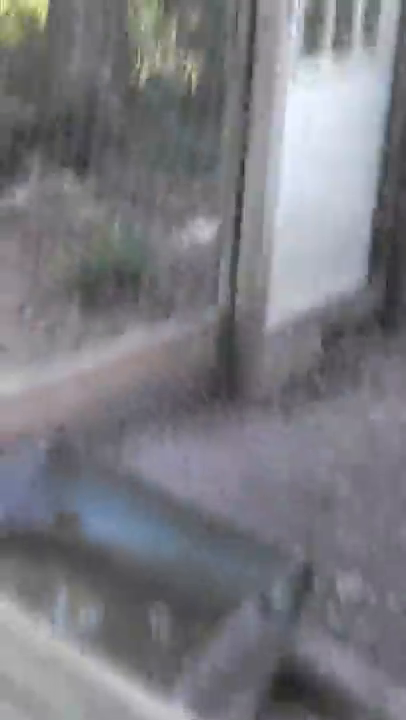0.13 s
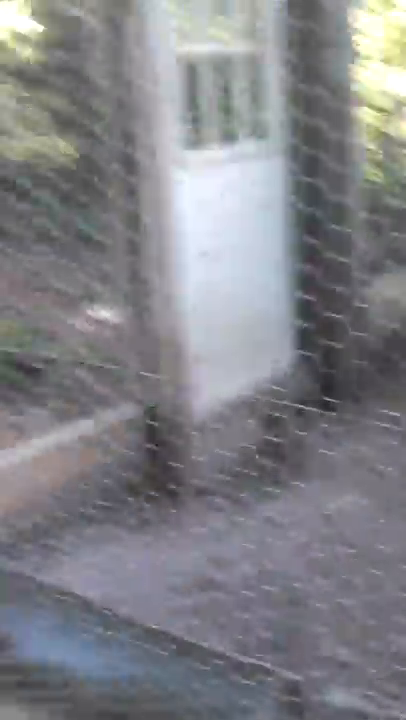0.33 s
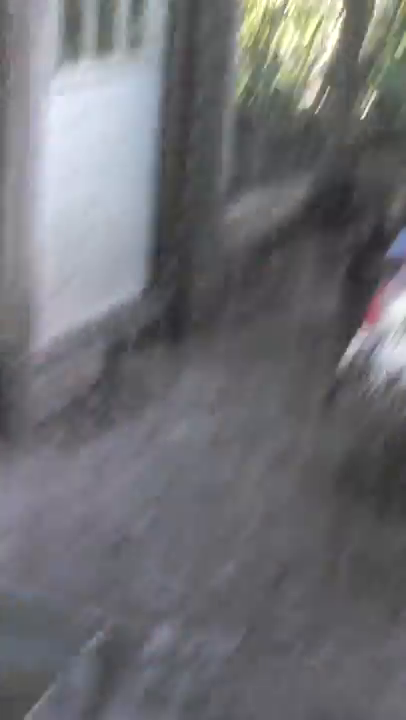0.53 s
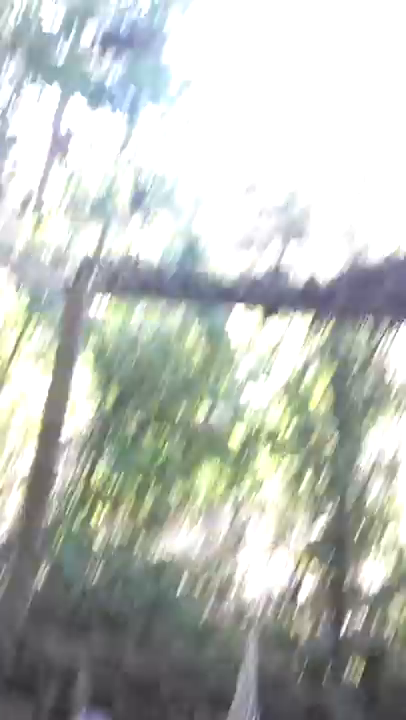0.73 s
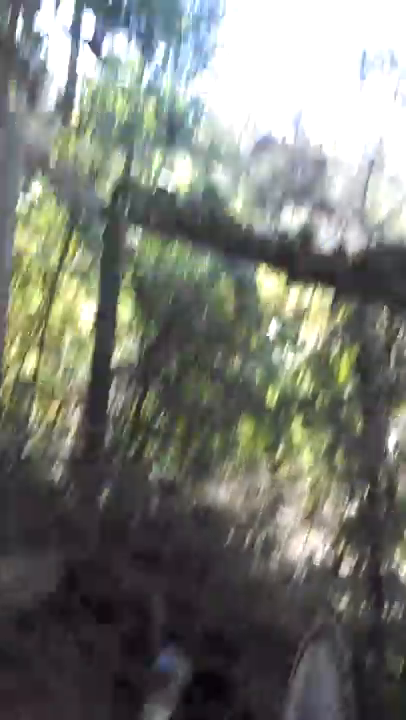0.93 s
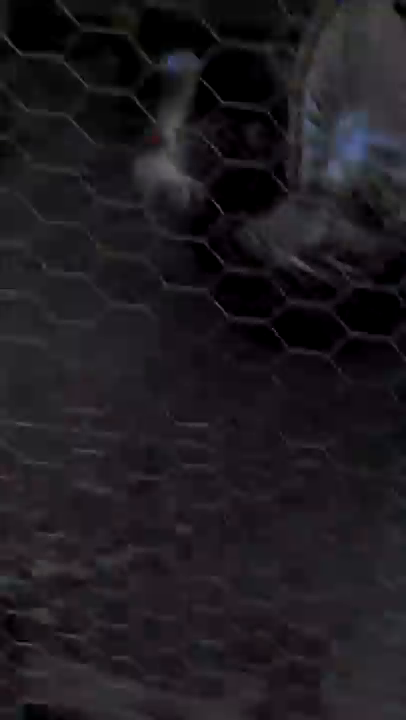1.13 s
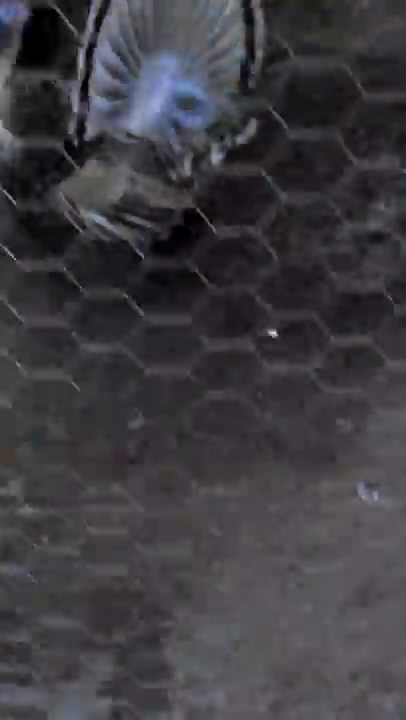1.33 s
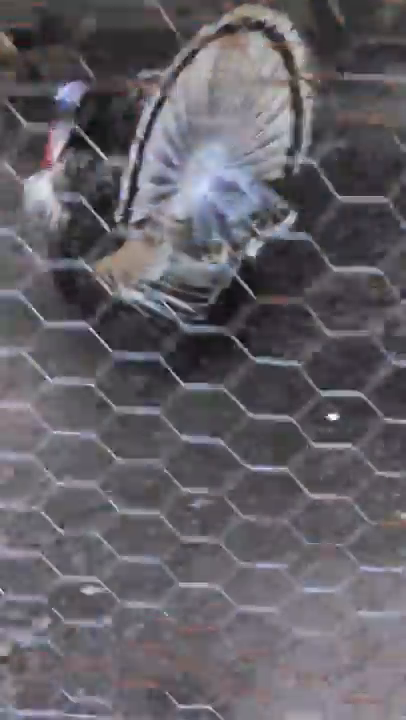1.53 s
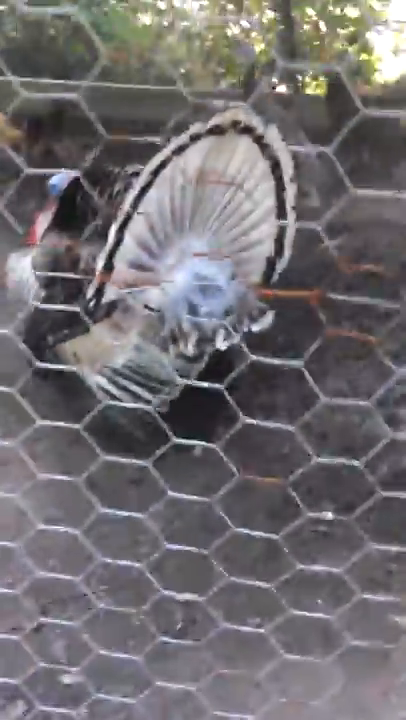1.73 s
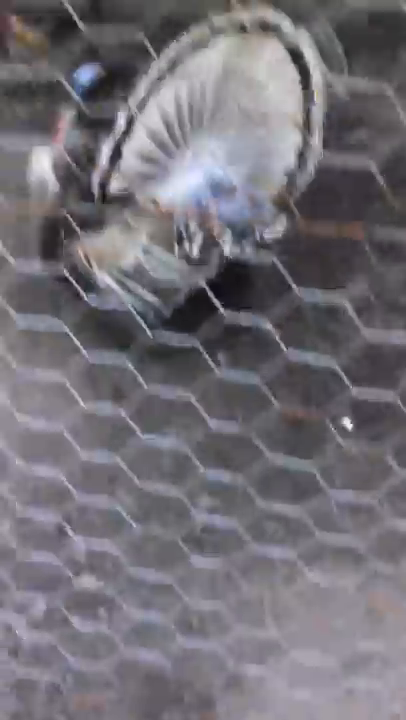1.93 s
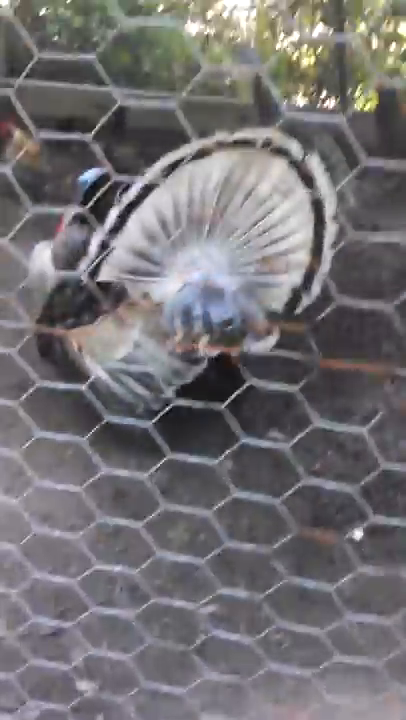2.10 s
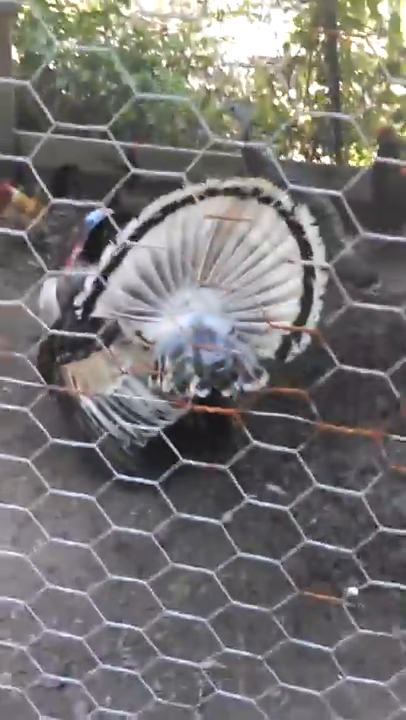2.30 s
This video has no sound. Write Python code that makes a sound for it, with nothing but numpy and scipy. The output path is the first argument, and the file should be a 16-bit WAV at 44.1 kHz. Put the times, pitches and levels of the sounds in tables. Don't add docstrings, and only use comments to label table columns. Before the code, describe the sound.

Turkey's single short spit with a deep drum beneath, then dragging feathers and knocks, outdoors

```python
import sys
import numpy as np
from scipy import signal
from scipy.io import wavfile
from scipy.ndimage import uniform_filter1d

SR = 44100
rng = np.random.default_rng(int(sys.argv[2]) if len(sys.argv) > 2 else 0)


def store_pcm(level_fs):
    pcm = np.round(np.clip(level_fs, -1, 1) * 32767).astype(np.int16)
    wavfile.write(sys.argv[1], SR, np.atleast_2d(pcm).T)


def boost_factor(decibels):
    exponent = np.asarray(decibels, float) / 20
    return 10 ** exponent


N = 108397
TIME = np.arange(N) / SR
PORT_LEAD_S = 0.00013


def read(points, hz):
    f, value = np.transpose(points)
    return np.interp(np.log(hz + 1), np.log(f + 1), value)


def curve(points, col=1):
    rows = np.transpose(points)
    return np.interp(TIME, rows[0], rows[col])


def evened(x):
    return x / np.sqrt(np.mean(x ** 2) + 1e-20)


def sides(pan_db):
    return boost_factor(np.array([[pan_db / 2], [-pan_db / 2]]))


def hump(middle, length):
    return np.exp(-.5 * ((TIME - middle) / (length / 3)) ** 2)


def resonate(x, hz, width):
    turn = np.exp(2j * np.pi * hz * np.arange(x.shape[-1]) / SR)
    r = np.exp(-np.pi * width / SR)
    return 2 * (turn * signal.lfilter([1 - r], [1, -r], x / turn + 1e-18)).real


# (frequency [Hz], likeness [0-1])
PORT_LIKENESS = [(70, 0.19), (300, 1), (550, 0.65), (1000, 0.63), (1600, 0.43), (2800, 0.34), (5000, 0)]


def noise(tone, patchy_db, tilt_db=0):
    frames, hz = N // 128 + 5, np.fft.rfftfreq(512, 1 / SR)
    a, b, c, d, patches = rng.standard_normal((frames, 257, 5)).T
    patches = uniform_filter1d(patches, size=8, axis=0)
    patches = evened(uniform_filter1d(patches, size=14, axis=1))
    same = np.clip(read(PORT_LIKENESS, hz), -1, 1)[:, None]
    lag = np.exp(2j * np.pi * hz * PORT_LEAD_S * (1 + hz / 2000))[:, None]
    left = a + 1j * b
    right = same * left * lag + np.sqrt(1 - same ** 2) * (c + 1j * d)
    tilt = np.interp(np.arange(frames) * 128, np.arange(N), tilt_db * np.ones(N))
    tilt = tilt * (hz / (hz + 7000))[:, None]
    gain = boost_factor(read(tone, hz)[:, None] + patchy_db * patches + 5.1 * tilt)
    z = np.array([left, right]) * gain
    return evened(signal.istft(z, nperseg=512, noverlap=384)[1][:, :N])


# (frequency [Hz], level [dB])
WASH_TONE = [(25, -14), (70, 12), (150, -7.5), (350, 6.5), (900, -8), (3500, -15), (7500, -20),
             (10000, -40)]
# (time [s], treble level [dB])
LEAVES = [(0, 7.6), (.3, 4.34), (.5, 3.74), (1.3, 2.9), (1.6, 2.5), (1.95, 0.51), (2.46, 1.46)]
# (time [s], level [dB])
CART = [(1.2, -65), (1.4, -47), (2.46, -52)]
WASH_DB = -42


def wash():
    out = boost_factor(WASH_DB) * noise(WASH_TONE, 2.22, curve(LEAVES)) * sides(-3.1)
    cart = resonate(rng.standard_normal((2, N)), 205, 170)
    return out + boost_factor(curve(CART)) * evened(resonate(cart, 205, 170))


# (frequency [Hz], level [dB], width [Hz])
HUM = [(376.6, -52, 2.76), (559, -56.5, 8.5), (455, -65.5, 10)]
# (time [s], level [dB])
DRONE = [(0, -45), (.17, -39.5), (.35, -51), (.8, -56), (.9, -44), (1.1, -38), (1.4, -46), (1.55, -51),
         (2.1, -47), (2.46, -44.5)]
# (time [s], level [dB])
WHINE = [(0, -59), (.3, -54.5), (.6, -55.5), (1.1, -55), (1.4, -63.5), (1.75, -61), (2.05, -58),
         (2.46, -62)]
DRONE_HZ, WHINE_HZ = 515.2, 752.3


def motor():
    out = np.zeros((2, N))
    late = TIME - np.array([[PORT_LEAD_S], [0]])
    lines = [*HUM, (DRONE_HZ, curve(DRONE), 6), (WHINE_HZ, curve(WHINE), 8)]
    for hz, db, width in lines:
        wobble, sway = resonate(resonate(rng.standard_normal((2, N)), 0, width), 0, width)
        level = boost_factor(db + 1 + 3.28 * evened(sway))
        out += level * np.sin(2 * np.pi * hz * late + 0.79 * evened(wobble)) * sides(-5.5)
    return out


def grains():
    bursts = boost_factor(4.0 * np.minimum(rng.exponential(1, N), 3)) * (rng.random(N) < .01)
    return .8 + uniform_filter1d(bursts, size=40) * 3.0


# (middle [s], length [s], level [dB], brightness [0-1], pan [dB])
SCUFFS = [(.0, 0.036, -36.5, 0.86, 12), (0.078, 0.26, -37, 0.74, 5), (0.395, 0.048, -35, 0.31, 10),
          (0.555, 0.061, -40, 0.54, -9.5), (0.654, 0.072, -38, 0, 5.5), (0.726, 0.017, -38, 0.52, -11.5),
          (0.858, 0.095, -35, 0.65, -9.5), (1.362, 0.057, -39.5, 0.64, -7), (1.665, 0.046, -46.5, 0.2, 11),
          (2.013, 0.04, -40.5, 0.08, -16), (2.176, 0.037, -36, 0, 5), (2.367, 0.052, -39.5, 0.03, 7),
          (2.44, 0.11, -39.5, 0.1, 0)]
# (frequency [Hz], level [dB])
DULL = [(200, 4.5), (400, 11.5), (900, 0.5), (1600, 3.5), (2600, -1), (3900, -0.5), (5500, -46),
        (15000, -108)]
# (frequency [Hz], level [dB])
BRIGHT = [(200, -5.5), (2500, -12), (3600, 0.5), (5000, -0.5), (7000, 0.5), (8500, -3), (10500, -15.5),
          (15500, -12.5)]


def scuffs():
    grit = grains()
    dull, bright = noise(DULL, 3.0) * grit, noise(BRIGHT, 1.8) * grit
    out = np.zeros((2, N))
    for s, length, db, brightness, pan_db in SCUFFS:
        colour = (1 - brightness) * dull + brightness * bright
        out += boost_factor(db) * sides(pan_db) * hump(s, length) * colour
    return out


# (peak [s], length [s], level [dB], frequency [Hz], pan [dB])
THUMPS = [(0.011, 0.044, -38.5, 62.2, -6), (0.343, 0.056, -42.5, 70, -16.5), (0.449, 0.061, -41.5, 118, -1),
          (0.724, 0.046, -41.5, 65, -4.5), (1.036, 0.029, -30, 70.5, -9.5), (1.357, 0.09, -40, 68, -8.5),
          (1.42, .03, -40.5, 193, -2.5), (1.49, 0.015, -29.5, 111, 10.5), (1.545, 0.068, -20, 75, 0.3),
          (1.934, 0.045, -24.5, 74, -16.5), (1.951, 0.025, -23.5, 80.5, -12), (2.064, 0.068, -32.5, 55, 4),
          (2.241, 0.03, -34, 61, -2.5), (2.318, 0.065, -36, 68.4, -1), (2.435, 0.068, -38, 62, 0.5)]
LEAD_PER_DB = 0.6


def thumps():
    out, right = np.zeros((2, N)), np.array([[0], [1]])
    for s, length, db, hz, pan_db in THUMPS:
        phase = 2 * np.pi * hz * (TIME - s) - LEAD_PER_DB * pan_db * right
        out += boost_factor(db) * sides(pan_db) * hump(s, length) * np.cos(phase)
    return out


# (time [s], peak level [dB], frequency [Hz], width [Hz], pan [dB])
TICKS = [(.267, -38, 4000, 3000, -2), (.325, -46, 4600, 3000, -7), (.533, -33.5, 4000, 3000, -3),
         (0.559, -40, 12000, 6000, 0), (0.7212, -37.5, 8800, 7000, 2), (.803, -43, 10000, 7000, -3),
         (.937, -35, 9000, 9000, 0), (0.9441, -34, 6000, 6000, -9), (.986, -34, 5500, 4000, -3),
         (1.014, -38, 11000, 9000, 2), (1.021, -45, 12000, 7000, 7), (1.065, -43, 12000, 7000, -2),
         (1.0745, -27.5, 5700, 3460, -15), (1.0795, -33, 5500, 3500, -8), (1.098, -48, 4000, 3000, -3),
         (1.135, -41, 11000, 7000, -9), (1.17, -34, 6960, 4970, -6), (1.21, -36, 6050, 4000, 6),
         (1.218, -34, 9450, 9000, 8), (1.287, -31.5, 8700, 9000, -23), (1.313, -29, 6100, 3980, -4),
         (1.3475, -20, 4300, 3800, -5), (1.349, -32.5, 1100, 900, -3), (1.8625, -16, 2360, 4470, -10.5),
         (1.863, -23.5, 790, 800, -9), (1.865, -20.5, 1800, 2500, -3)]


def ticks():
    out, t = np.zeros((2, N)), np.arange(600) / SR
    for s, db, hz, width, pan_db in TICKS:
        dust = rng.standard_normal((2, 600)) * boost_factor(-60 * t / .012)
        crack = (t == 0) + .1 * dust
        for _ in range(3):
            crack = resonate(crack, hz, width)
        at = round(s * SR)
        out[:, at:at + 600] += boost_factor(db) * sides(pan_db) * crack / abs(crack).max()
    return out


# (time [s], frequency [Hz], level [dB])
WHISTLE = [
    (.585, 2600, -64),
    (.605, 2760, -50),
    (.625, 2840, -48),
    (.64, 2660, -58),
    (.68, 2700, -50),
    (.72, 2780, -42),
    (.765, 2660, -48),
    (.8, 2300, -58),
    (.85, 1980, -66),
]


def bird():
    waver_hz = 25 * evened(uniform_filter1d(rng.standard_normal(N), size=300))
    waver_db = 2.5 * evened(uniform_filter1d(rng.standard_normal(N), size=500))
    turns = np.cumsum(curve(WHISTLE) + waver_hz) / SR
    on = (TIME > WHISTLE[0][0]) & (TIME < WHISTLE[-1][0])
    level = on * boost_factor(curve(WHISTLE, col=2) - 1 + waver_db)
    return level * np.sin(2 * np.pi * turns - np.array([[0], [2.1]])) * sides(-5)


# (frequency [Hz], width [Hz], level [dB])
THROAT = [(653, 120, 1), (808, 116, 1), (1180, 140, -5.5), (1670, 220, 1.5), (2790, 440, 0),
          (6200, 600, -16)]
THROAT_PAN_DB = [7.5, -12.5, 15.5, -5, -13.5, 30.5]
RATTLE_S, RATTLE_HZ, RATTLE_DB = 1.5012, 201.3, -21
RATTLE_LATE_S_PER_HZ, RATTLE_ROUGH = 4.5e-6, 0.25


def rattle():
    kicks = np.zeros(N)
    for k in range(5):
        kicks[round((RATTLE_S + k / RATTLE_HZ) * SR)] = 1
    air = rng.standard_normal((2, N)) * RATTLE_ROUGH * 0.22 * (TIME > RATTLE_S)
    out, sign = np.zeros((2, N)), 1
    for (hz, width, db), pan_db in zip(THROAT, THROAT_PAN_DB):
        low = min(hz, 2000)
        swell = hump(RATTLE_S + 0.00087 + low * RATTLE_LATE_S_PER_HZ, 0.013 + low * 4e-6)
        ring = resonate((air - kicks) * swell, hz, width) * SR / (2 * np.pi * width)
        out += sign * boost_factor(db) * sides(pan_db) * ring
        sign = -sign
    return boost_factor(RATTLE_DB) * out


# (time [s], level [dB])
HISS = [
    (1.495, -77),
    (1.506, -36),
    (1.53, -28),
    (1.547, -24),
    (1.575, -30),
    (1.592, -32),
    (1.615, -39.5),
    (1.66, -47),
    (1.92, -53.5),
]
# (frequency [Hz], level [dB])
HISS_TONE = [(300, -7.5), (1000, -11.5), (2600, -10), (4200, -3.5), (7000, 4), (8700, -6.5), (10500, -18),
             (15500, -10.5)]
# (time [s], treble level [dB])
BEAK = [(1.51, -3), (1.545, -3.5)]
HISS_PAN_DB, HISS_THROB, DRUM_HZ = 5, .2, 75


def hiss():
    throb = 1 + HISS_THROB * np.cos(2 * np.pi * DRUM_HZ * (TIME - 1.5425))
    return boost_factor(curve(HISS)) * throb * noise(HISS_TONE, 2.2, curve(BEAK)) * sides(HISS_PAN_DB)


# (time [s], level [dB])
DRAG = [
    (1.62, -75),
    (1.68, -48),
    (1.77, -45.5),
    (1.84, -48),
    (1.93, -52),
    (2.0, -63),
]
# (frequency [Hz], width [Hz], level [dB])
DRAG_BANDS = [(1430, 380, -0.5), (2214, 350, -5), (3130, 770, 0.5), (369, 128, 4), (1100, 430, -6.5)]


def drag():
    soil = rng.standard_normal((2, N)) * grains()
    out = np.zeros((2, N))
    for hz, width, db in DRAG_BANDS:
        out += boost_factor(db) * evened(resonate(resonate(soil, hz, width), hz, width))
    return boost_factor(curve(DRAG)) * out * sides(-12.0)


# (time [s], level [dB], frequency [Hz], decay by 60 dB [s], pan [dB])
KNOCKS = [
    (1.842, -26, 96, 0.036, -18),
    (1.862, -20, 72, 0.081, -14),
    (1.941, -17, 111, 0.016, -16),
    (2.0104, -21, 85, 0.088, -14.5),
]
KNOCK_BEND, KNOCK_BEND_S = 2.5, 0.0034


def knocks():
    out = np.zeros((2, N))
    for s, db, hz, t60, pan_db in KNOCKS:
        u = np.maximum(TIME - s, 0)
        turns = hz * (u + KNOCK_BEND * KNOCK_BEND_S * (1 - np.exp(-u / KNOCK_BEND_S)))
        level = (1 - np.exp(-u / 0.0028)) * boost_factor(db - 60 * u / t60)
        out -= level * sides(pan_db) * np.sin(2 * np.pi * turns)
    return out


def scene():
    air = wash() + motor() + bird()
    turkey = scuffs() + thumps() + rattle() + hiss() + drag()
    return air + turkey + ticks() + knocks()


CROSS, CROSS_LAG = 0.74, 16
EDGE_HZ = 15450


def widen(x):
    other = np.pad(x[::-1], ((0, 0), (CROSS_LAG, 0)))[:, :N]
    wide = x - min(CROSS, 1) * other
    return signal.oaconvolve(wide, signal.firwin(255, EDGE_HZ, fs=SR)[None], "same")


# (frequency [Hz], level under the neighbours [dB])
GATE = [(1000, -30), (1300, -12.5), (7500, -10), (10500, -2)]
MASK_DB = -.5


def gate(x):
    mid_side = np.array([x[0] + x[1], x[0] - x[1]]) / 2
    hz, _, z = signal.stft(mid_side, SR, nperseg=2048)
    power = abs(z[:, 1:]) ** 2
    bands = np.repeat(power.reshape(2, 128, 8, -1).mean(axis=2), 8, axis=1)
    near = np.log(bands.mean(axis=0) + 1e-20)
    near = 1.35 * np.exp(uniform_filter1d(near, size=50, axis=0))
    far = power[:, 200:360].mean(axis=(0, 1))
    hidden = abs(hz[1:, None] - 2720) < 400
    around = np.maximum(near, far * boost_factor(2 * MASK_DB) * hidden)
    z[:, 1:] *= bands > around * boost_factor(2 * read(GATE, hz[1:]))[:, None]
    mid, side = signal.istft(z, nperseg=2048)[1][:, :N]
    return np.array([mid + side, mid - side])


def top_cut(x):
    return signal.sosfilt(signal.butter(12, 16800, fs=SR, output="sos"), x)


def record(dry):
    mix = gate(widen(dry))
    return top_cut(mix)


dry = scene()
out = record(dry)
store_pcm(out)
```